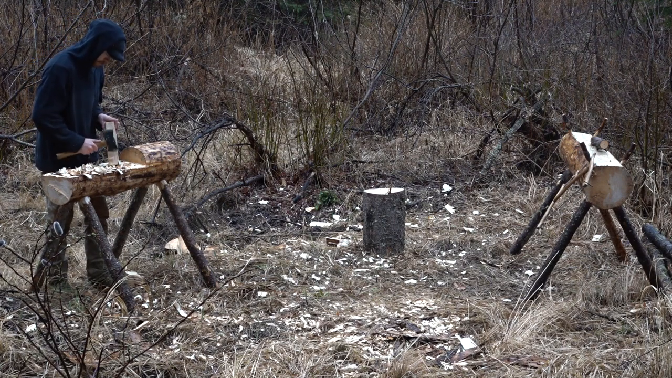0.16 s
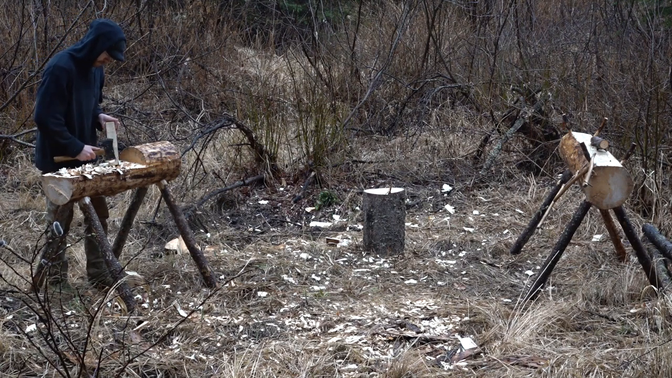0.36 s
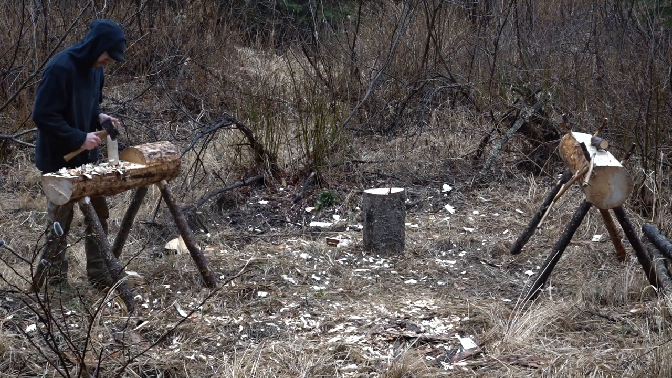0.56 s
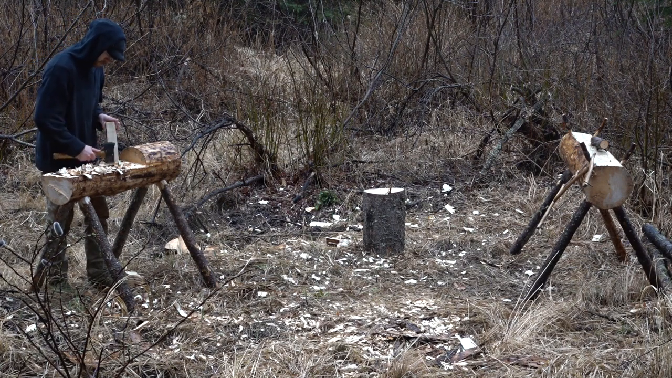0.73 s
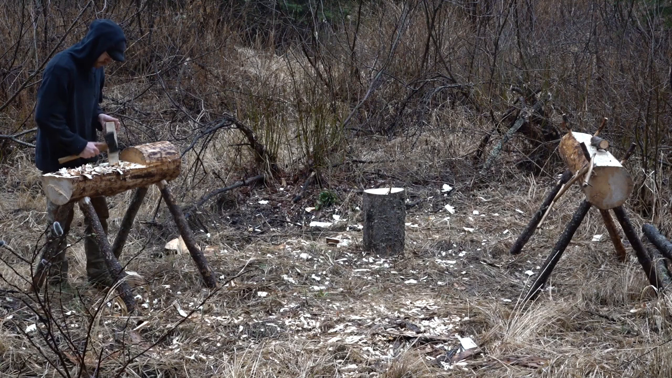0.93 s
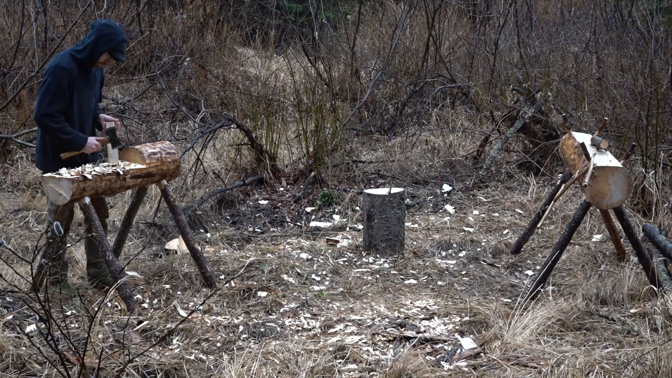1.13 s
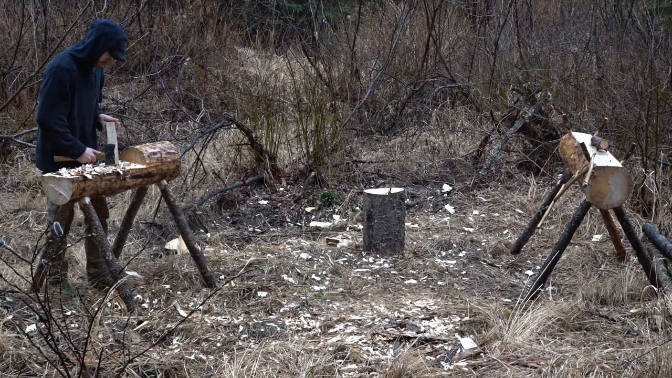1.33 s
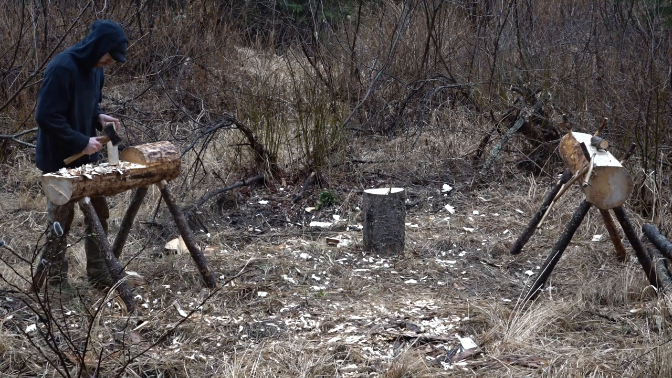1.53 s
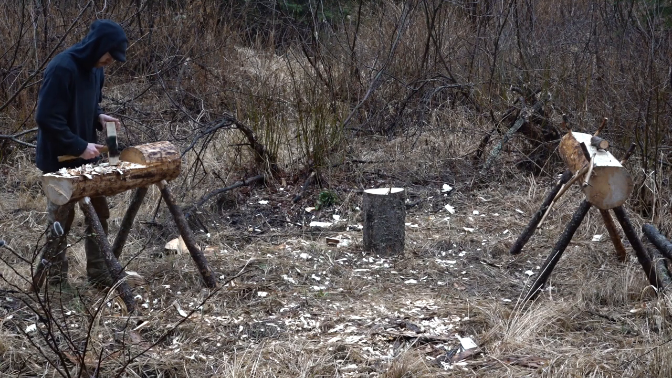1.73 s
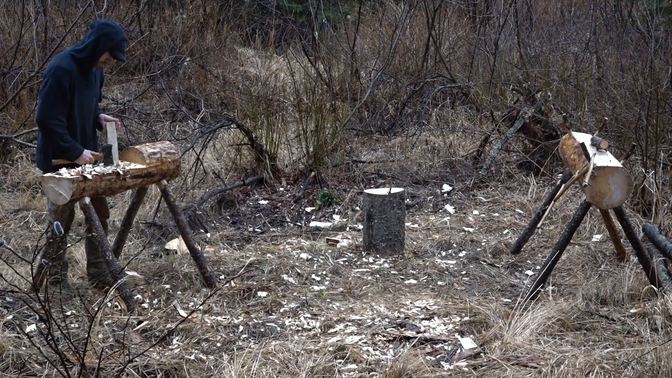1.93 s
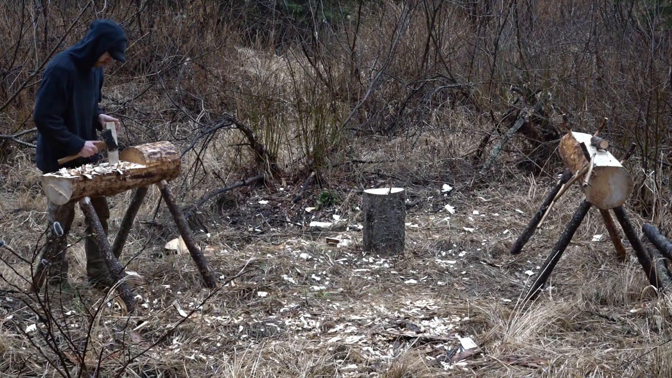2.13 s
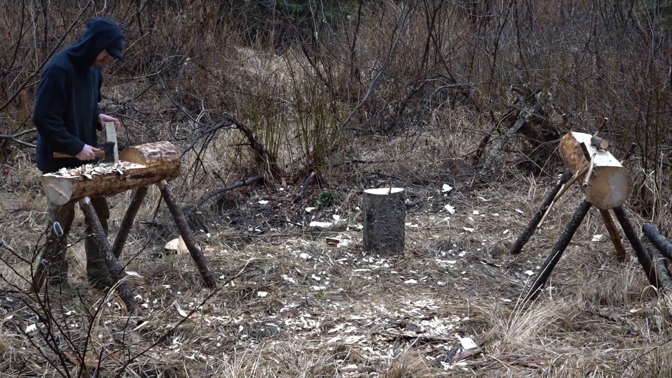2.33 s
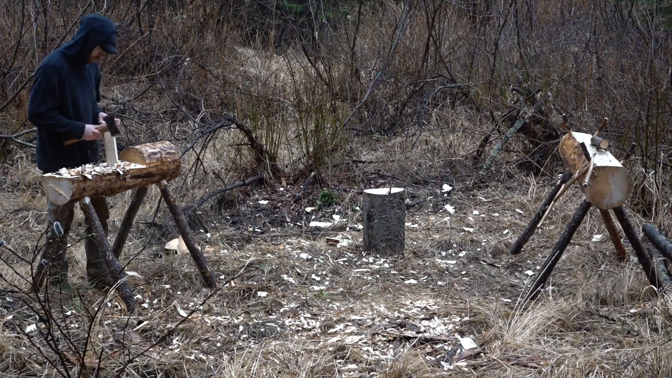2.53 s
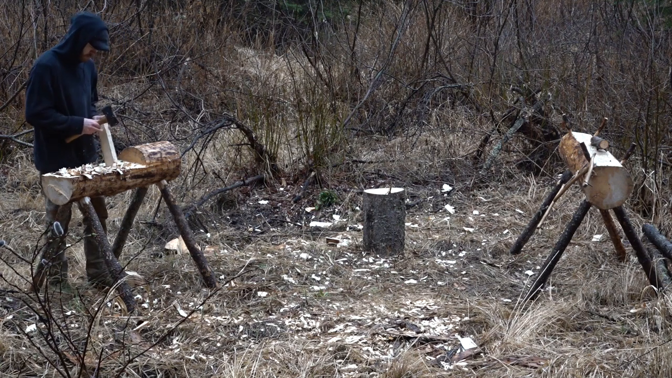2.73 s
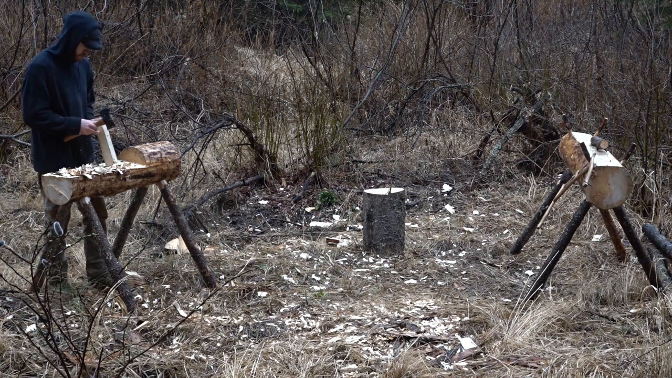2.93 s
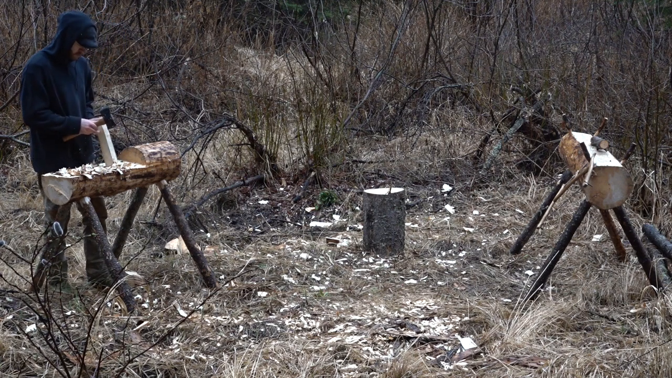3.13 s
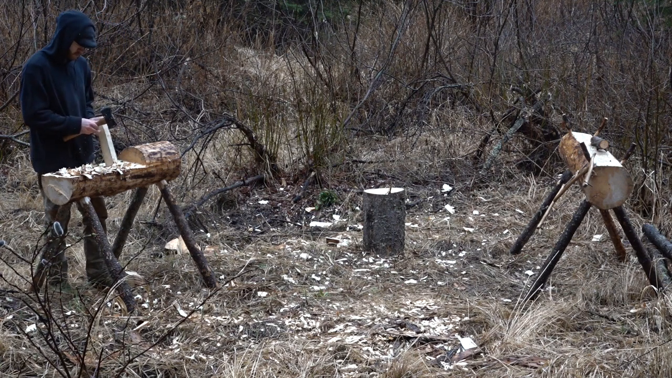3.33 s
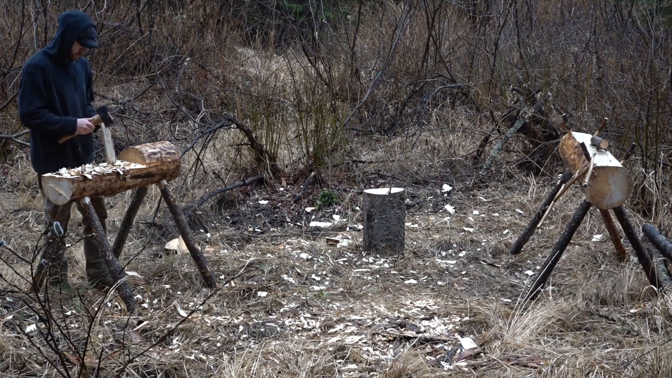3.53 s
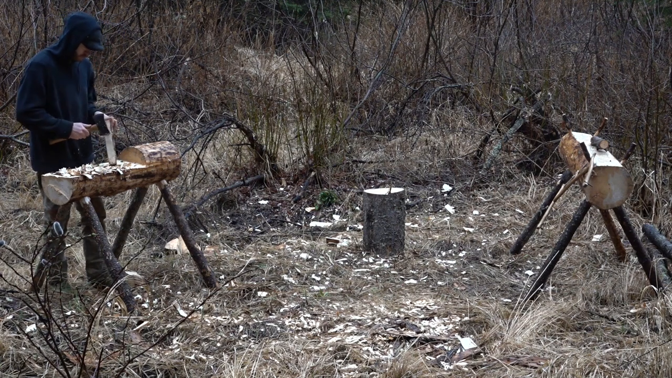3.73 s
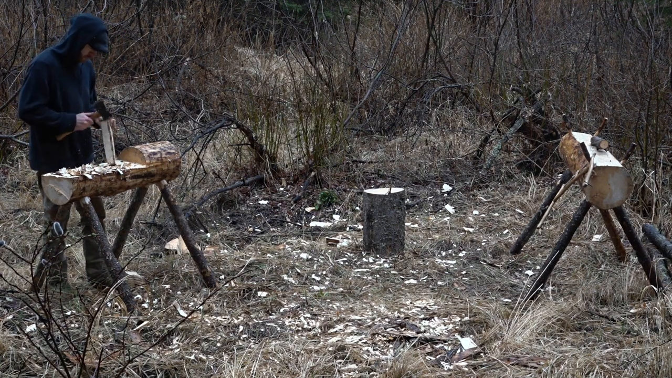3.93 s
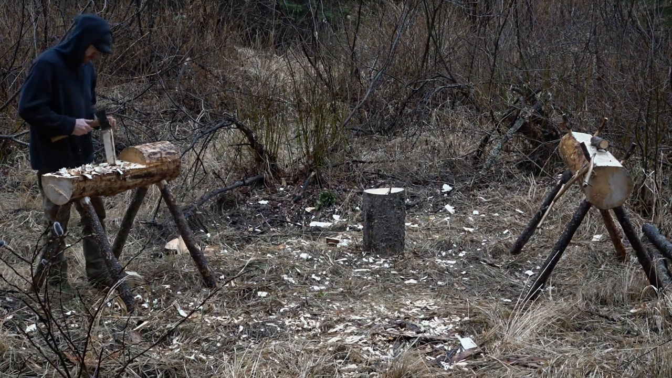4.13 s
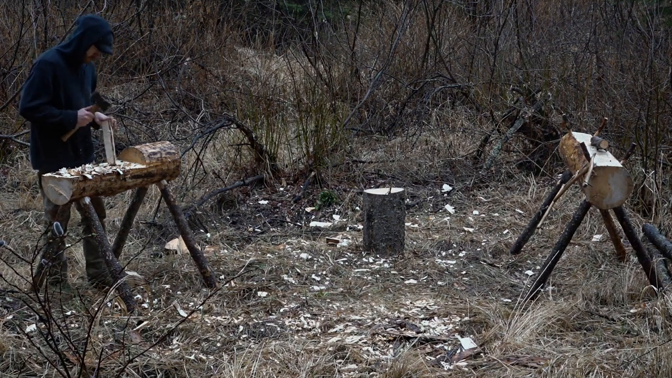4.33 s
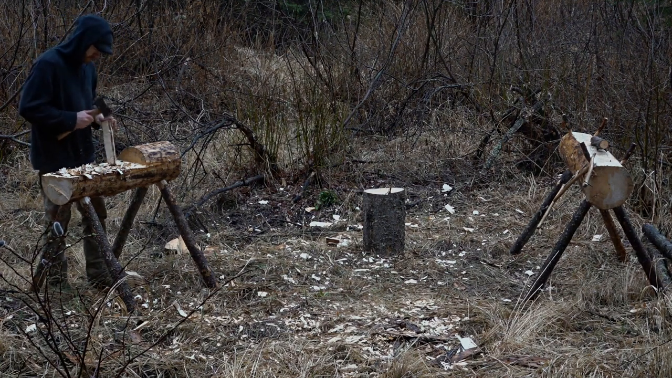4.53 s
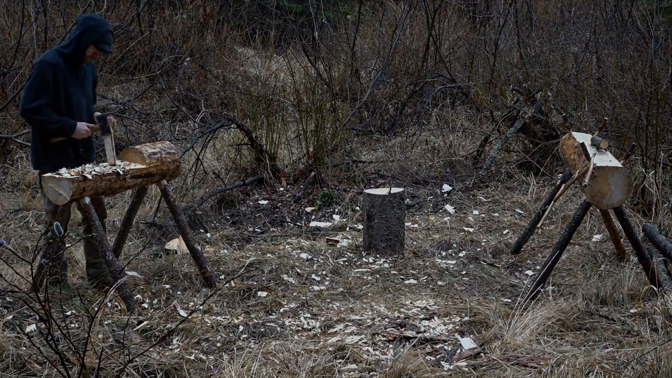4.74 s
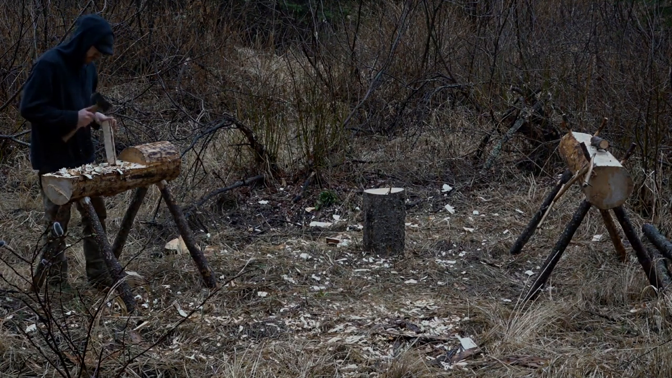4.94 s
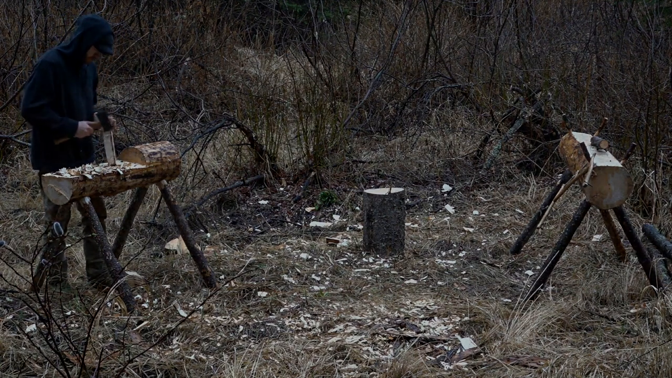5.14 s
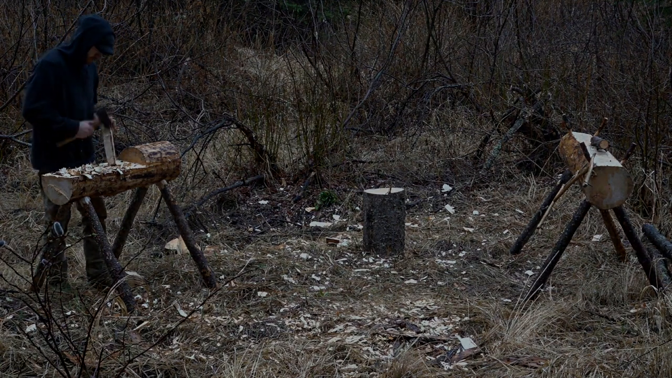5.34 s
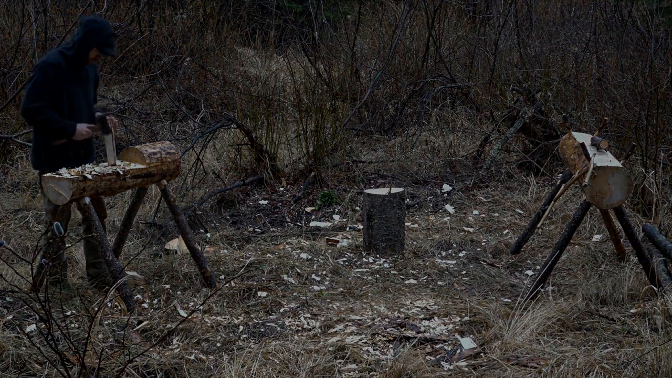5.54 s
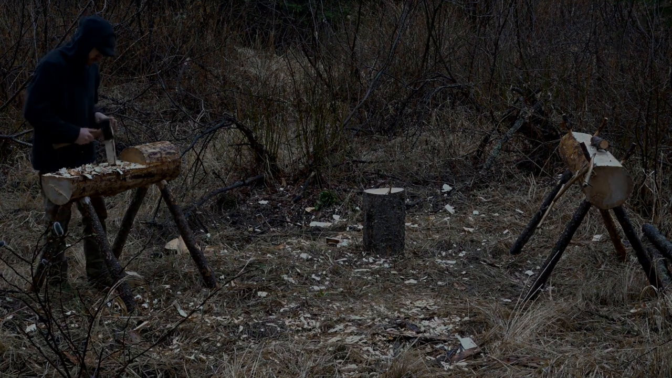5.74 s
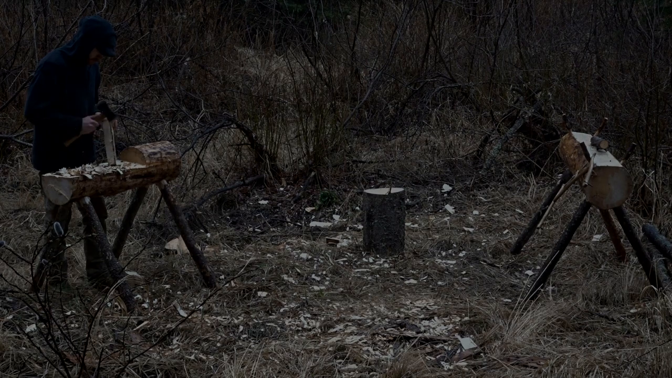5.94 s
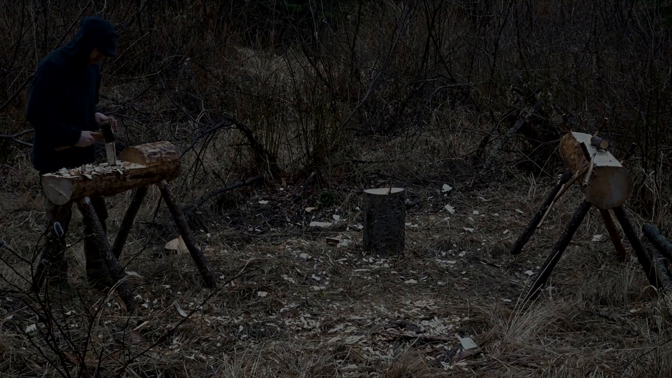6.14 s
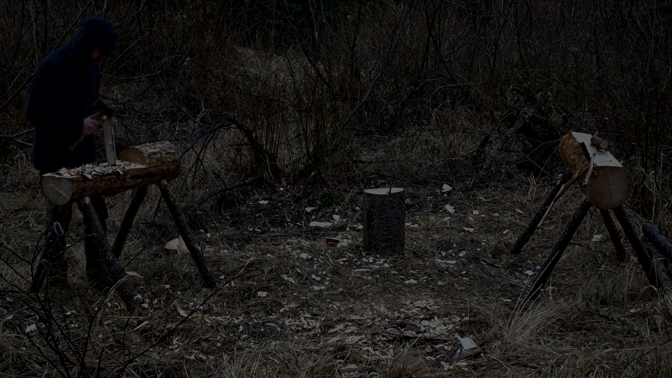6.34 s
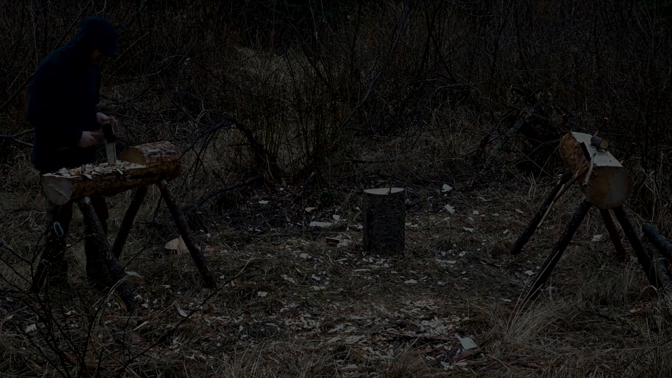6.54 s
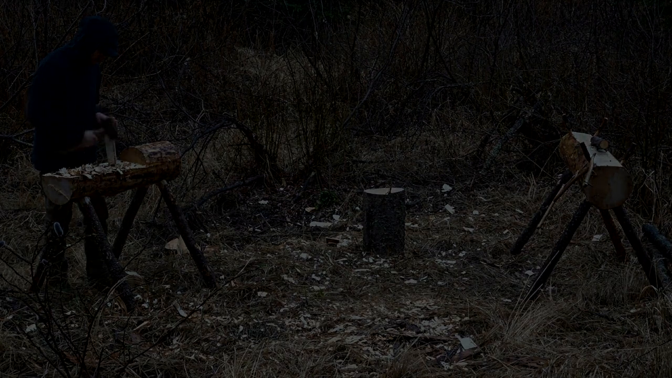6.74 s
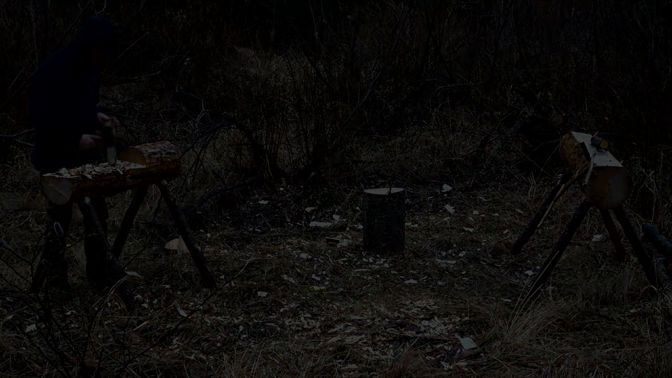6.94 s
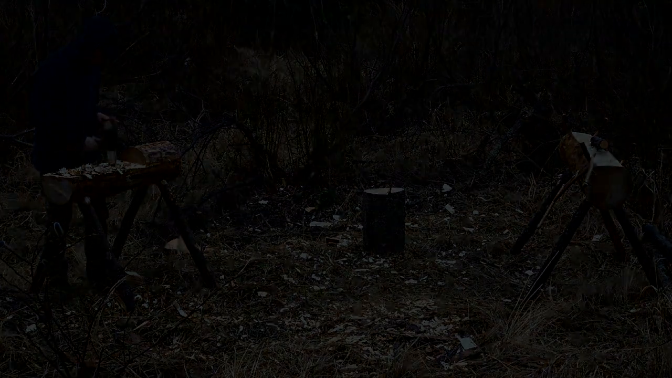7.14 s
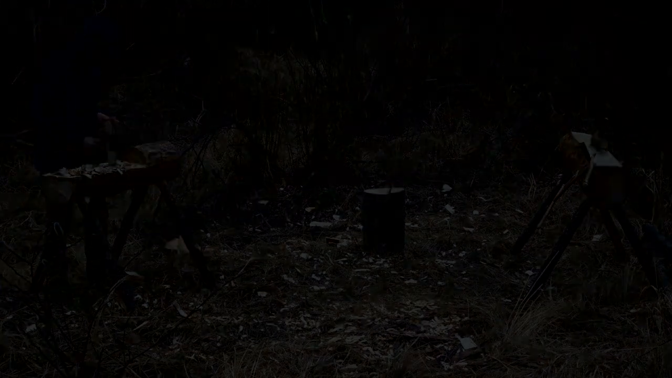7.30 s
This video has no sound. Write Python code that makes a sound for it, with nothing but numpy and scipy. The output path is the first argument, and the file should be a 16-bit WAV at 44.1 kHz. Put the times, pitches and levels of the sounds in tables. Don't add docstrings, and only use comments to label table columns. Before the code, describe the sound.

A quiet outdoor clearing with faint steady hiss and low distant traffic hum. From about 0.15 s a hatchet chops a short stick on a log trestle, a few metres off and slightly left: eight blows roughly 0.3 s apart until 2.3 s, the first the strongest. Each is a sharp woody crack with brief fibre crackle and a small blade ping, usually followed closely by a hollow knock of the stick's foot on the log. From 2.4 to 4.2 s there is a pause, with only tiny dry chip ticks on leaves and a barely audible knock near 3.7 s. Chopping restarts at 4.2 s, very light and more metallic, growing through 5.1 s. A quick double hit falls at 5.5 s, then firmer blows peak near 6.5 s, easing with two softer ones at 6.9 and 7.25 s. Brush scatters a short faint tail.

```python
import sys
import numpy as np
from scipy import signal
from scipy.fft import rfft, irfft, next_fast_len
from scipy.io import wavfile
from scipy.ndimage import uniform_filter1d

SR = 44100
rng = np.random.default_rng(int(sys.argv[2]) if len(sys.argv) > 2 else 0)


def how_loud(loudness_db):
    steps = np.asarray(loudness_db, float) / 20
    return 10 ** steps


def to_wav(s):
    ch = np.atleast_2d(s).T
    pcm = np.round(np.clip(ch, -1, 1) * 32767)
    wavfile.write(sys.argv[1], SR, pcm.astype(np.int16))


N = 325017
SPAN = 8192
HZ = np.fft.rfftfreq(SPAN, 1 / SR)
T = np.arange(SPAN) / SR
LEAD_S = 0.001


def unit(x):
    return x / np.sqrt(np.mean(x ** 2) + 1e-20)


def along(points, hz):
    point_hz, values = np.transpose(points)
    return np.interp(np.log(hz + 1), np.log(point_hz + 1), values)


def filtered(x, response):
    size = next_fast_len(N + SR // 2)
    return irfft(rfft(x, size) * response(np.fft.rfftfreq(size, 1 / SR)), size)[..., :N]


def add(track, start_s, sound):
    part = track[..., round(start_s * SR):][..., :sound.shape[-1]]
    part += sound[..., :part.shape[-1]]


def ring(modes, detune):
    hz, db, t60_s = np.transpose(modes)[:, :, None]
    hz = hz * (1 + detune * rng.standard_normal(hz.shape))
    db = db + 2.5 * rng.standard_normal(db.shape)
    decay = how_loud(db - 60 * T / np.abs(t60_s))
    return np.sum(decay * np.sin(2 * np.pi * hz * T), axis=0)


def pressed(x, contact_hz, edge_hz):
    force = np.exp(-(HZ / contact_hz) ** 2 - 2j * np.pi * HZ * LEAD_S)
    low = 1j * HZ / edge_hz
    radiation = low ** 2 / (1 + 1.45 * low + low ** 2)
    return irfft(rfft(x) * force * radiation, SPAN)


def jolt(hz):
    turns = hz * (T - LEAD_S)
    lean = np.tanh(4 * turns)
    u = (np.pi * turns * (1.12 - 0.16 * lean)) ** 2
    return (2 * u - 1) * np.exp(-u) * (1 - 0.3 * lean)


def resonant(modes):
    response = 0
    for k, (hz, width, db) in enumerate(modes):
        peak = 1j * HZ * width / (hz * hz - HZ ** 2 + 1j * HZ * width)
        response = response + (-1) ** k * how_loud(db) * peak
    return response


def snap(colour, t60_s, rough, count):
    clumps = np.exp(rough * np.repeat(rng.standard_normal(SPAN // 16), 16))
    envelope = how_loud(-60 * T / abs(t60_s)) * (1 - np.exp(-T / 0.00036))
    burst = rng.standard_normal((count, SPAN)) * clumps * envelope
    return irfft(rfft(burst / np.abs(burst).max()) * colour, SPAN)


# pitch_hz, density_db [dB per Hz]
AIR_SPECTRUM = [(8.8, -33), (15, 0.5), (71, -2.5), (222, -12.5), (265, -13), (325, -12.5), (535, -12.5),
                (830, -15.5), (907, -15), (2930, -29), (3590, -30.5), (14700, -39.5), (16500, -44)]
# pitch_hz, likeness [0 to 1]
SIDE_LIKENESS = [(60, 0.88), (180, 0.59), (550, 0.36), (1650, 0.29), (4970, 0.19), (15000, 0.01)]


def air(level_db, patchy_db):
    z = signal.stft(rng.standard_normal((2, N)), nperseg=512)[2]
    field = uniform_filter1d(rng.standard_normal(z.shape[1:]), size=6, axis=0)
    field = uniform_filter1d(field, size=14, axis=1)
    pair = signal.istft(z * how_loud(patchy_db * unit(field)), nperseg=512)[1][:, :N]

    def mid_side(hz):
        turn = np.arccos(np.clip(along(SIDE_LIKENESS, hz), -1, 1)) / 2
        return how_loud(along(AIR_SPECTRUM, hz)) * np.array([np.cos(turn), np.sin(turn)])

    mid, side = filtered(pair, mid_side)
    return how_loud(level_db) * np.array([mid + side, mid - side]) / np.std(mid)


# start_s, peak_db, contact_pitch_hz, log_ring_db, blade_ping_db
BLOWS = [(0.1561, -7, 1270, -14.5, -21), (0.4613, -12, 940, -17.5, -39), (0.7616, -14, 785, -14, -35),
         (1.065, -18, 820, -6, -27.5), (1.3807, -11, 1130, -17, -36), (1.7061, -11.5, 1100, -15.5, -29),
         (2.0227, -16.5, 930, -11.5, -24), (2.3323, -21, 770, -9, -39), (4.2092, -35.5, 540, -2, -9),
         (4.5028, -34, 655, 0, -3.5), (4.8055, -28.5, 720, -2.5, -14), (5.141, -24.5, 740, -15, -4),
         (5.4617, -16.5, 990, -16, -19.5), (5.5122, -19, 890, -14, -28), (5.8476, -17.5, 790, -10, -23),
         (6.1757, -14, 845, -11.5, -15.5), (6.5187, -11, 1100, -14, -21), (6.7774, -41, 820, -20, -10),
         (6.8753, -21, 700, -3.5, -14.5), (7.253, -20.5, 790, -8, -20)]
# pitch_hz, level_db, t60_s
LOG = [(470, -0.5, 0.041), (533.7, -2, 0.094), (650, -2, 0.04), (776, -18, 0.18), (982, -0.5, 0.09),
       (1100, 0.5, 0.049), (1270, -25, 0.047)]
# pitch_hz, level_db, t60_s
STICK = [(1010, -5, 0.049), (1202, 5.5, 0.027), (1723, 4, 0.039), (1834, 0.5, 0.022), (2300, 1.5, 0.03),
         (2420, 5, 0.013), (3370, -16, 0.0086)]


def blows():
    out = np.zeros(N)
    for start_s, peak_db, hz, log_db, _ in BLOWS:
        wood = how_loud(log_db - 7) * ring(LOG, detune=0.014)
        wood += how_loud(-18.5) * ring(STICK, detune=0.025)
        hit = jolt(hz) - pressed(wood, 2.82 * hz, edge_hz=415)
        add(out, start_s - LEAD_S, how_loud(peak_db) * hit)
    return out


# start_s, blade_pitch_hz, fibre_pitch_hz, blade_crackle_db
CUT = [(0.15, 2580, 6800, -8), (0.5, 2520, 7460, -18), (1.1, 2680, 6940, -11), (1.4, 2720, 6300, -2),
       (1.7, 2510, 6800, -16), (2.3, 2870, 7140, -18), (4.2, 2924, 7000, -16), (4.6, 2874, 10700, -17),
       (5.15, 2916, 7340, -20), (5.46, 2740, 7940, -13), (5.52, 2830, 6100, -6), (5.85, 2820, 7340, -5),
       (6.2, 2990, 8900, 5.5), (6.521, 2990, 9900, 2), (6.534, 2950, 5800, -16), (6.8, 2890, 6500, -12),
       (7.3, 2800, 6900, -11)]


def cut(time_s):
    times_s, *columns = np.transpose(CUT)
    return [np.interp(time_s, times_s, column) for column in columns]


# start_s, peak_db, length_s, stick_db
SPLITS = [(0.156, -27, 0.015, 2), (0.4603, -29.5, .0094, -14), (0.466, -40, 0.011, 5),
          (0.7657, -29, 0.02, 9), (0.784, -37.5, 0.0035, 15.5), (1.067, -40, 0.013, 3),
          (1.0845, -41.5, 0.011, 14), (1.3794, -29, 0.023, -4), (1.7055, -32, 0.0051, -9),
          (1.711, -40.5, 0.034, 2), (2.0201, -36, 0.027, 12.5), (2.3335, -41.5, 0.03, 5),
          (4.2082, -47.5, 0.043, 8.5), (4.502, -38.5, 0.018, 7), (4.5067, -29.5, .013, -6),
          (4.808, -32, 0.021, 2.5), (4.815, -35, 0.023, 3), (5.1405, -32, 0.055, -6),
          (5.145, -30.5, 0.019, 6.5), (5.465, -23.5, .011, -1), (5.479, -46, 0.029, 16.5),
          (5.512, -35, 0.0073, 14.5), (5.848, -34.5, 0.025, -5), (6.174, -29.5, 0.011, 10),
          (6.52, -27.5, .017, 14.5), (6.534, -23, .003, -5), (6.7754, -44, 0.0054, 7.5),
          (6.8745, -31, 0.024, 7.5), (6.911, -50, .024, 21), (7.252, -41, 0.039, 11)]
# pitch_hz, width_hz, level_db
KERF = [(700, 506, 6), (1100, 1070, 7), (1760, 970, 6.5), (2430, 1480, 2), (3400, 3000, -7)]
# pitch_hz, width_hz, level_db
WEDGED = [(2860, 140, -12), (5400, 350, -12), (6750, 300, -11), (8100, 350, -13), (10000, 700, -12)]


def splits():
    out, wood, steel = np.zeros((2, N)), resonant(KERF), resonant(WEDGED)
    for start_s, peak_db, length_s, wood_db in SPLITS:
        _, fibre_hz, steel_db = cut(start_s)
        fibres = resonant([(fibre_hz, 0.93 * fibre_hz, 3)]) ** 2
        colour = fibres + how_loud(wood_db + 10) * wood + how_loud(steel_db + 10.5) * steel
        add(out, start_s, how_loud(peak_db) * snap(colour, 2.17 * length_s, rough=0.65, count=2))
    return out


def blade():
    out, onset = np.zeros(N), 1 - np.exp(-T / 0.00041)
    for start_s, peak_db, _, _, ping_db in BLOWS:
        blade_hz = cut(start_s)[0]
        ping = ring([(blade_hz, peak_db + ping_db, 0.044)], detune=0)
        add(out, start_s, onset * ping)
    return out


# pitch_hz, t60_s
BRUSH_DECAY = [(300, 0.27), (1000, 0.36), (2500, 0.4), (4000, 0.24), (10000, 0.18)]
# pitch_hz, level_db
TWIGS = [(300, -9.5), (800, -10.5), (2000, -7), (2600, 0.5), (3000, -1.5), (3400, -2), (6000, 3),
         (12000, -2.5)]


def brush(chop):
    out, step = np.zeros((2, N)), round(0.31 * SR)
    scattered = filtered(chop, lambda hz: how_loud(along(TWIGS, hz)))
    for i in range(0, N, step):
        hz, t, z = signal.stft(rng.standard_normal((2, SR // 2)), SR, nperseg=256)
        decay = how_loud(-60 * t / along(BRUSH_DECAY, hz)[:, None])
        fill_in = 1 - 0.088 * np.exp(-t / 0.064)
        tail = signal.istft(z * decay * fill_in, SR, nperseg=256)[1]
        tail = tail / np.linalg.norm(tail[0])
        add(out, i / SR + 0.006, signal.fftconvolve(scattered[None, i:i + step], tail, axes=1))
    return out


# start_s, peak_db, ring_pitch_hz, t60_s
KNOCKS = [(0.185, -45, 510, .02), (0.466, -20, 1380, 0.024), (0.778, -23.5, 570, 0.021),
          (0.7854, -21, 550, 0.024), (0.794, -26, 545.5, 0.071), (0.835, -38.5, 470, 0.038),
          (1.083, -23, 696, 0.025), (1.089, -22.5, 542, 0.067), (1.401, -24.5, 540, 0.024),
          (1.449, -40.5, 470, .03), (1.7195, -26.5, 650, 0.061), (1.7225, -18.5, 576, 0.031),
          (1.733, -24.5, 550, .023), (2.037, -29, 525, 0.021), (2.041, -26.5, 544, 0.045),
          (2.338, -22, 535, 0.044), (3.726, -50, 520, 0.063), (4.812, -32.5, 550, 0.02),
          (4.837, -32.5, 420, 0.02), (5.151, -31.5, 527, .09), (5.468, -28.5, 547, 0.02),
          (5.481, -32.5, 594, 0.044), (6.184, -30.5, 1010, 0.055), (6.523, -22.5, 615, 0.032),
          (6.535, -34.5, 534, 0.068), (6.882, -33, 664, .02), (6.896, -26.5, 617, 0.026),
          (6.91, -27, 690, 0.026), (7.278, -30.5, 556, 0.041), (7.291, -37.5, 605, 0.037)]


def knocks():
    out, swell = np.zeros(N), 1 - np.exp(-T / 0.0022)
    for start_s, peak_db, hz, t60_s in KNOCKS:
        note = ring([(hz, 0, t60_s)], detune=0)
        note += how_loud(-9) * ring(LOG, detune=0.011)
        note += how_loud(-16) * ring(STICK, detune=0.036)
        thump = swell * ring([(162.7, -21.5, 0.09)], detune=0.043)
        hit = thump + 0.74 * jolt(1.82 * hz) - pressed(note, 3.5 * hz, edge_hz=292)
        add(out, start_s - LEAD_S, how_loud(peak_db - 3) * hit)
    return out


# start_s, peak_db, pitch_hz, pan_db [left over right]
CHIPS = [(0.235, -49, 7900, 3), (0.305, -53, 6300, 6), (0.4318, -54, 7100, 5), (0.5007, -47, 7000, 14),
         (0.6245, -49, 5200, 12), (1.2989, -51, 9500, 6), (1.3242, -48, 7700, 9), (1.699, -42, 5500, 4),
         (1.8084, -42, 3000, -6), (2.4528, -48, 8300, 10), (2.5916, -48, 7000, 11), (2.626, -49, 7000, -1),
         (2.675, -47, 4500, -6), (2.943, -45.5, 3000, 13), (3.1707, -54, 7400, 7), (3.2517, -53, 7700, -2),
         (3.5657, -49.5, 8500, -15), (4.445, -38, 9500, 18), (4.467, -46, 6000, 5),
         (4.8708, -45.5, 5400, 14), (4.879, -47.5, 4400, 5), (5.3124, -54, 7200, 21),
         (5.9844, -52, 4400, 15), (6.1304, -51, 6100, 14), (6.174, -37, 7500, 4), (6.4871, -51, 7900, -1),
         (6.5758, -43, 9300, -2), (6.982, -51, 6700, 11), (7.0397, -46.5, 6000, -5), (7.1628, -51, 7000, 5)]


def chips():
    out = np.zeros((2, N))
    for start_s, peak_db, hz, pan_db in CHIPS:
        body_db = 1.5 + 9 * np.log2(7000 / hz)
        colour = resonant([(hz, 1.2 * hz, 0)]) ** 2 + resonant([(2730, 1500, body_db)])
        tick = snap(colour, t60_s=0.0039, rough=0.08, count=1)
        sides_db = np.array([[pan_db / 2], [-pan_db / 2]])
        add(out, start_s, how_loud(peak_db + sides_db) * tick / np.abs(tick).max())
    return out


# pitch_hz, lean_db [left minus right]
LEAN = [(200, 2), (1000, 2.2), (4000, 2.4), (7000, .3), (12000, 0)]


def direct(chop, unlike):
    def ground(hz):
        return 1 + 0.5 * np.exp(-2j * np.pi * hz * 0.001466) / (1 + 1j * hz / 2500)

    def sides(hz):
        return how_loud(along(LEAN, hz) * np.array([[0.5], [-0.5]]))

    def housing(hz):
        return np.array([[0.55], [-0.55]]) * hz / (hz + 6000)

    return filtered(chop, lambda hz: ground(hz) * sides(hz)) + filtered(unlike, housing)


def scene():
    tear, unlike = splits()
    chop = blows() + blade() + knocks() + tear
    mix = direct(chop, unlike) + how_loud(-13.5) * brush(chop) + chips()
    dulled = filtered(mix, lambda hz: 1 / (1 + (hz / 13500) ** 4))
    return dulled + air(level_db=-55.5, patchy_db=0.84)


def roll_off(x):
    return signal.sosfilt(signal.butter(12, 16640, fs=SR, output="sos"), x)


def record(dry):
    mix = filtered(dry, lambda hz: hz < 16100)
    return roll_off(mix)


dry = scene()
out = record(dry)
to_wav(out)
```